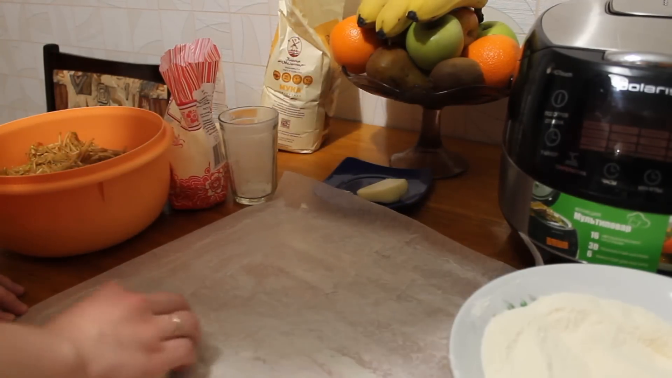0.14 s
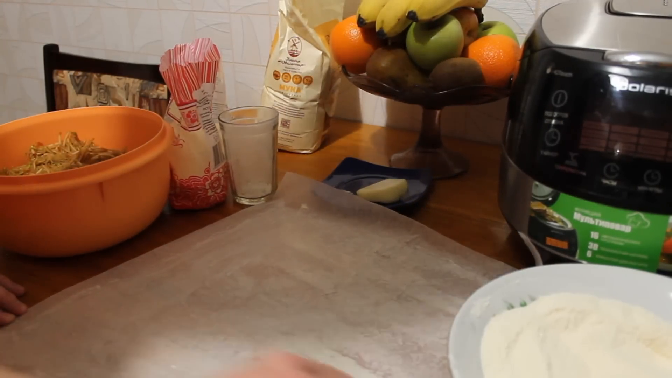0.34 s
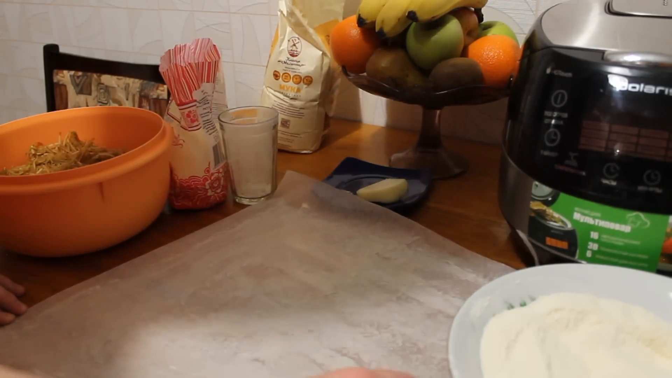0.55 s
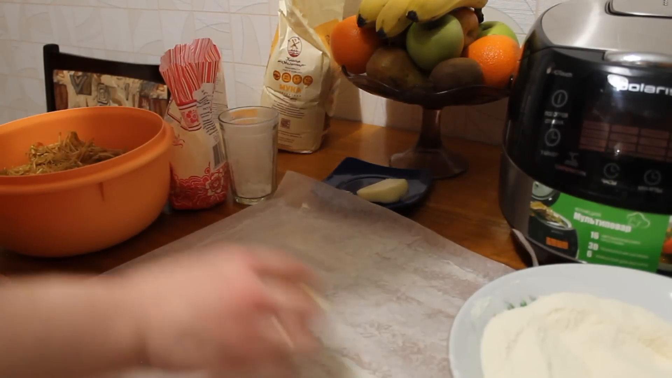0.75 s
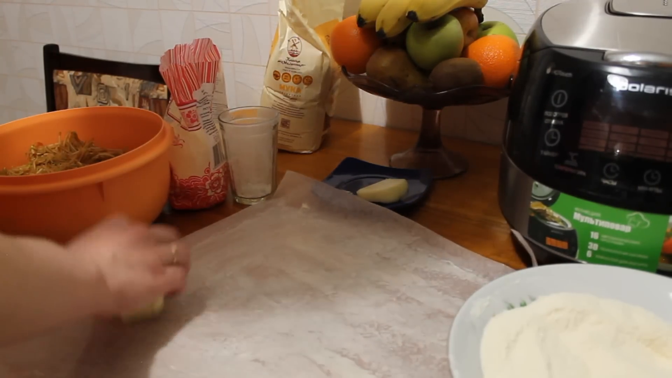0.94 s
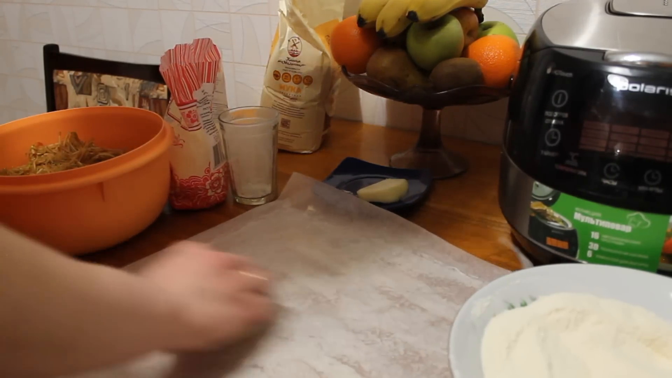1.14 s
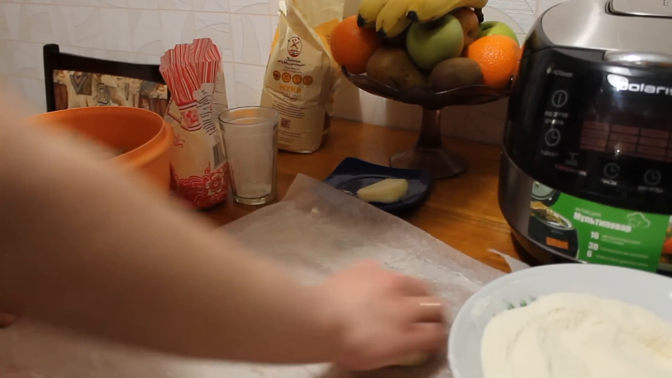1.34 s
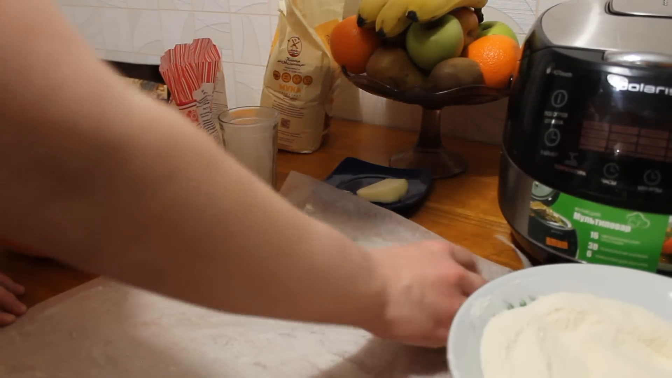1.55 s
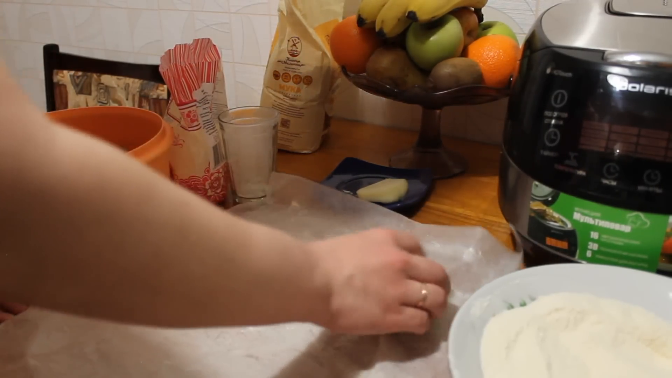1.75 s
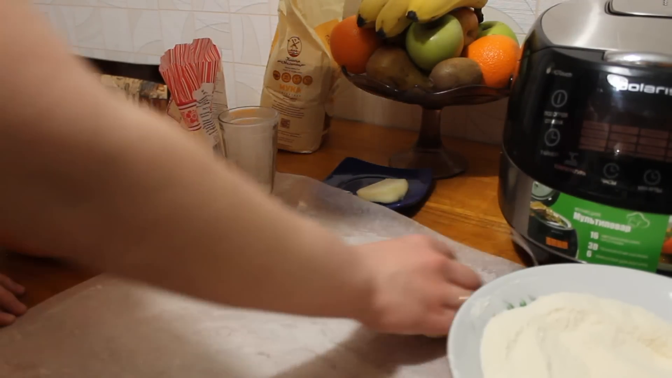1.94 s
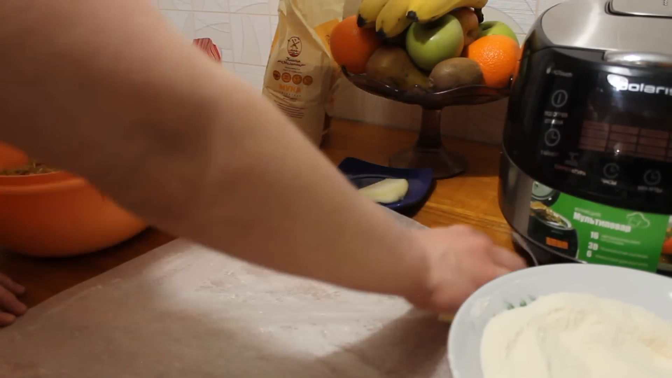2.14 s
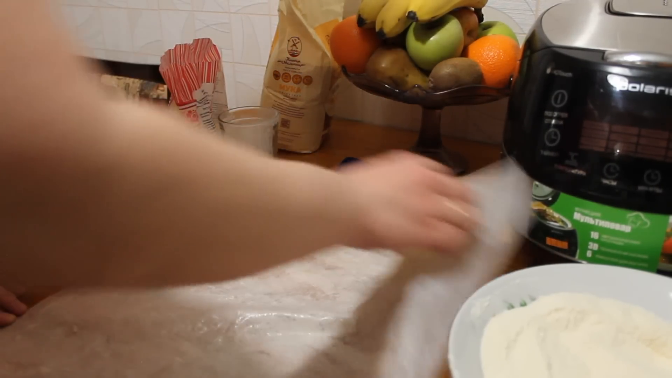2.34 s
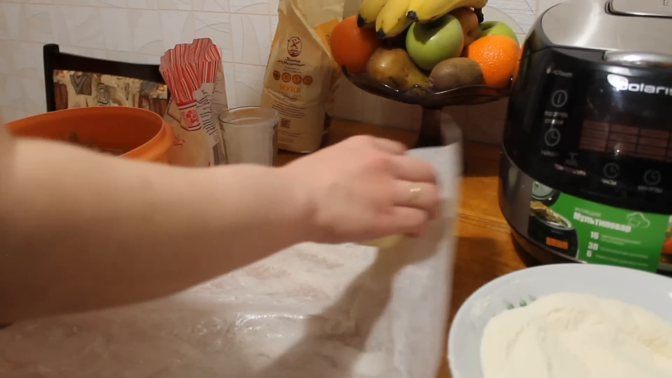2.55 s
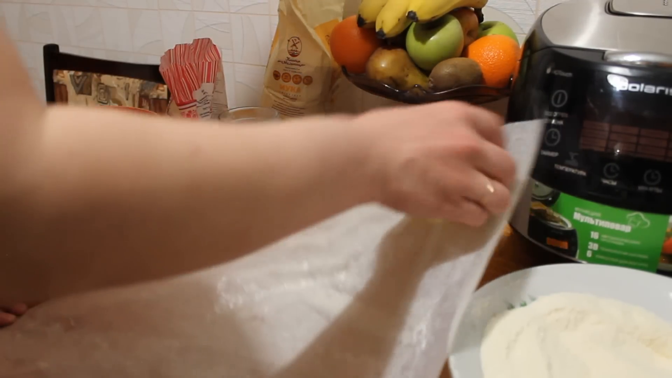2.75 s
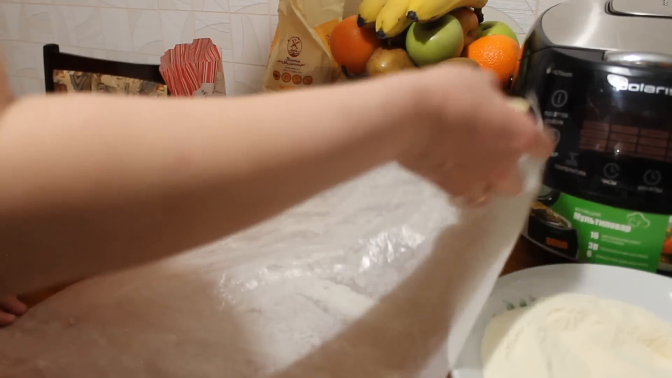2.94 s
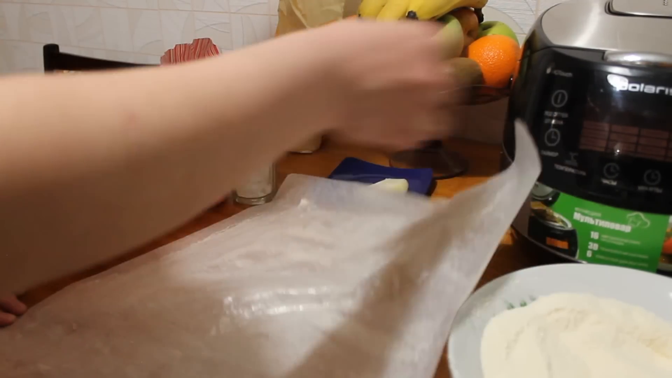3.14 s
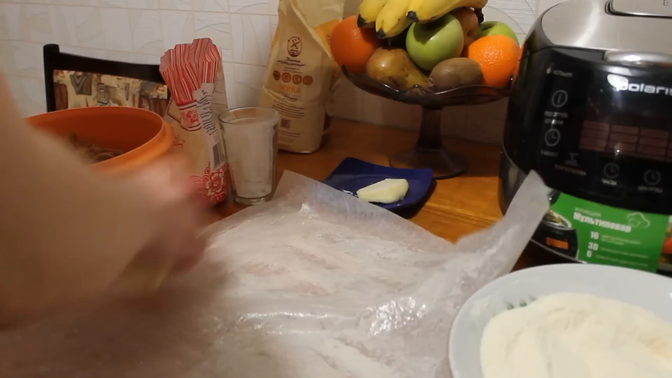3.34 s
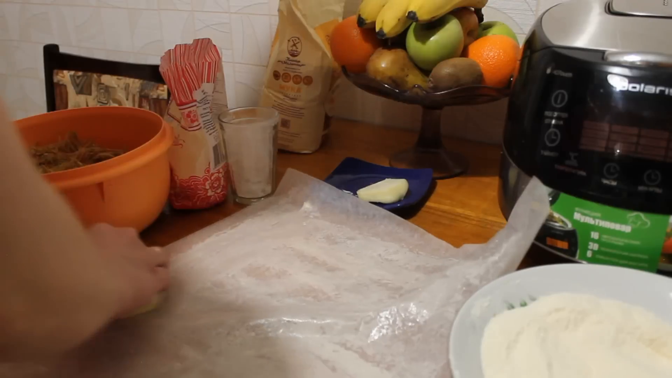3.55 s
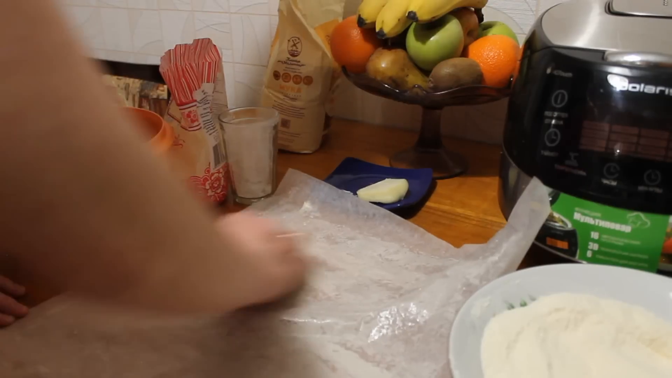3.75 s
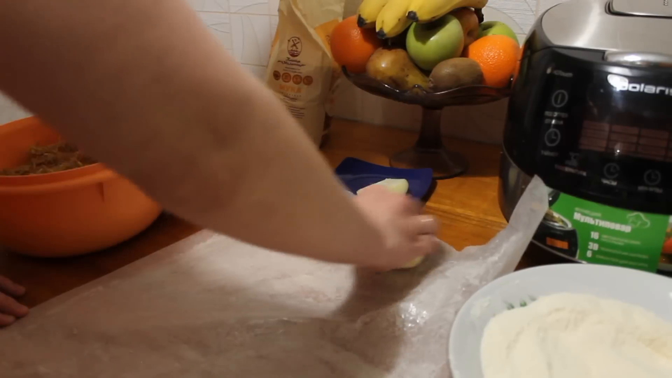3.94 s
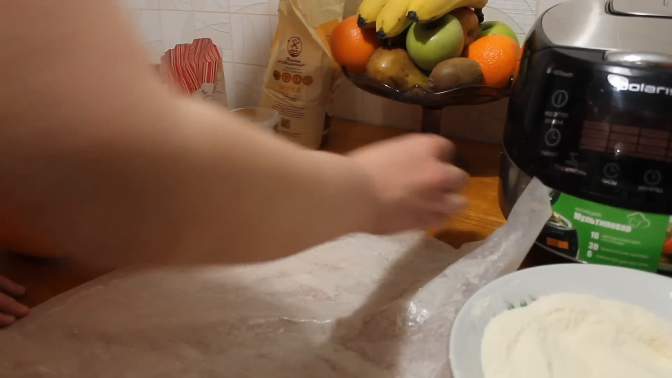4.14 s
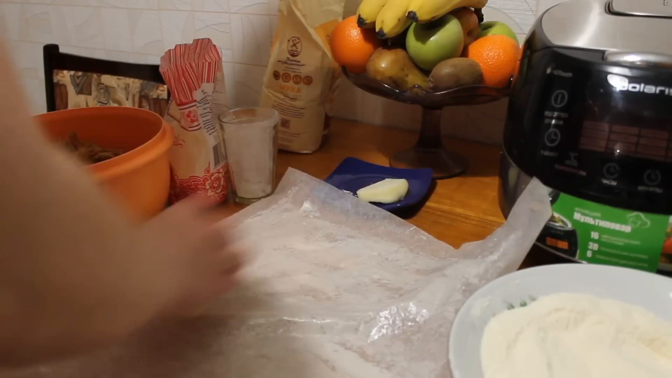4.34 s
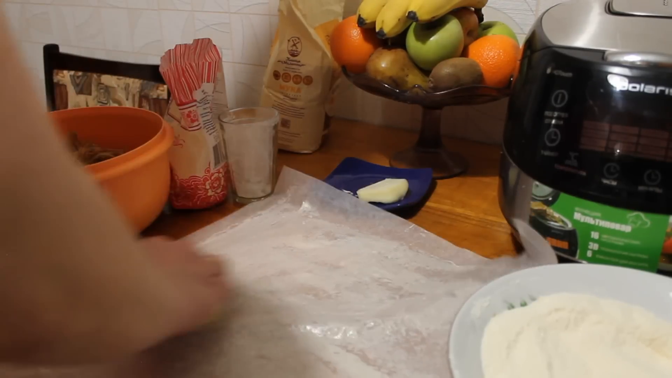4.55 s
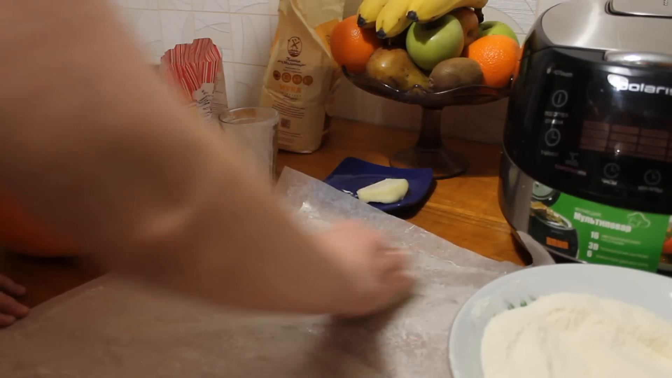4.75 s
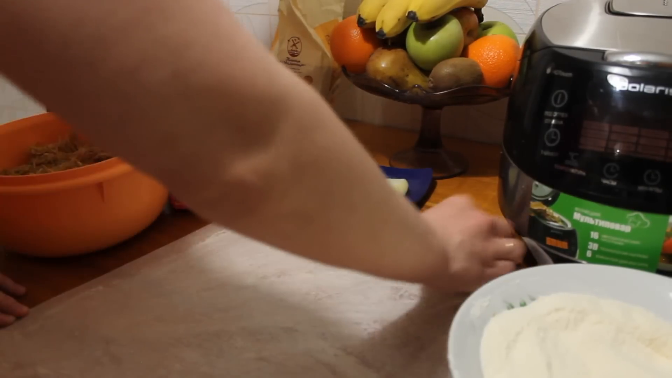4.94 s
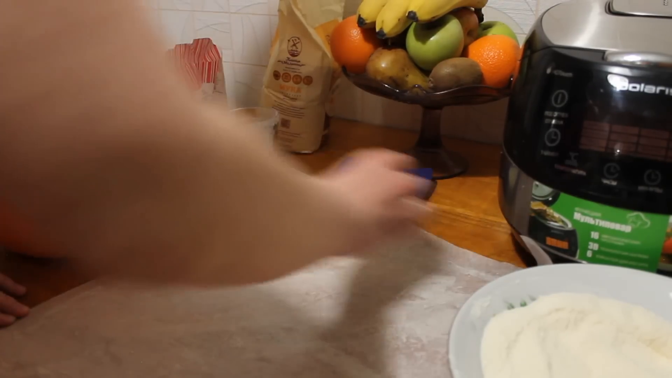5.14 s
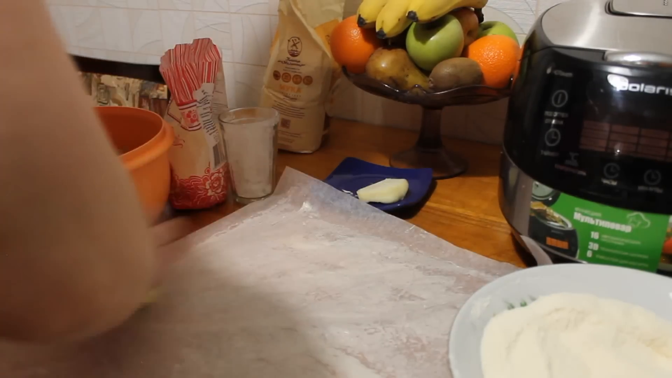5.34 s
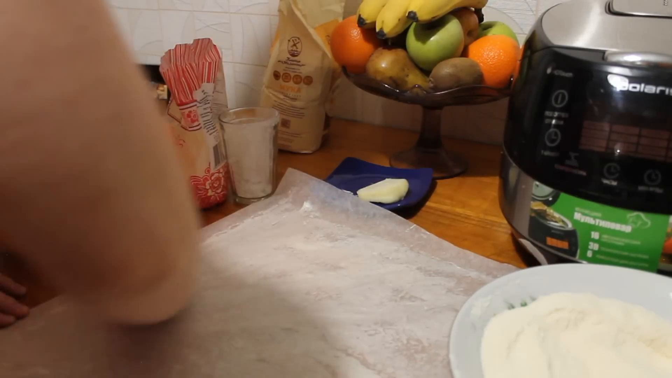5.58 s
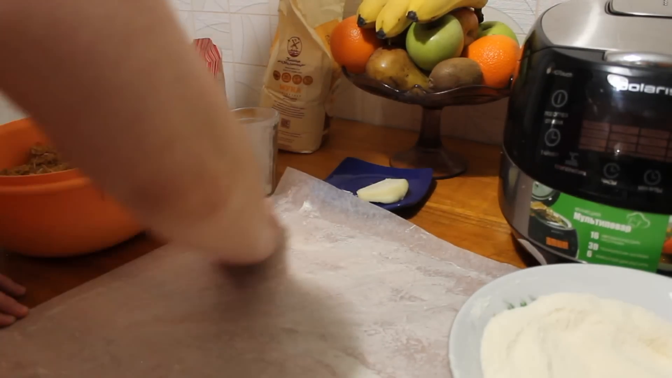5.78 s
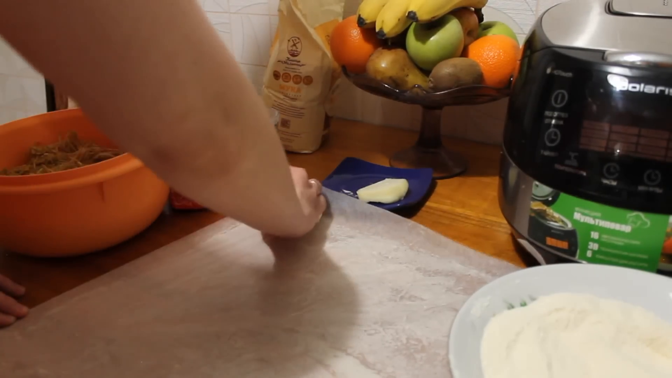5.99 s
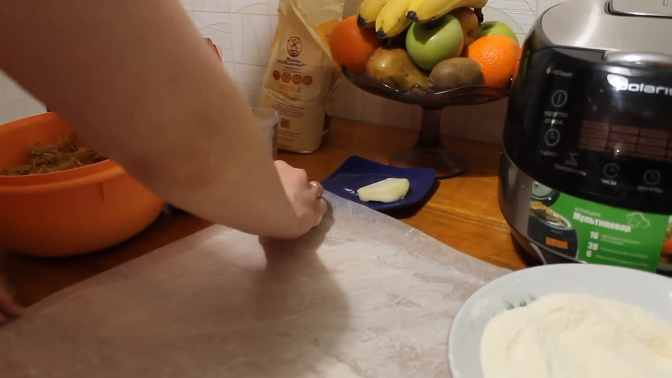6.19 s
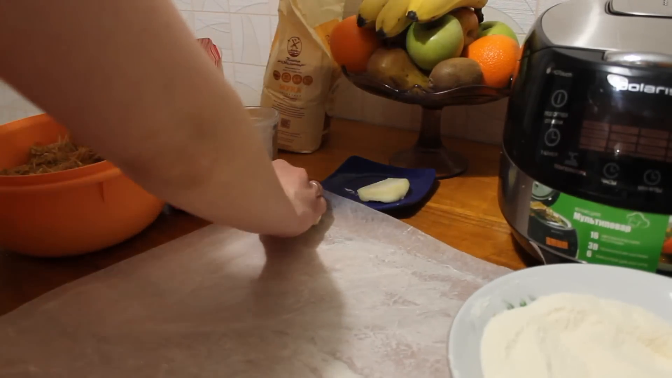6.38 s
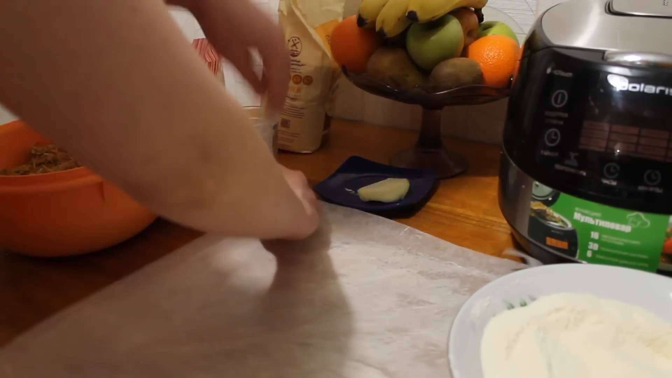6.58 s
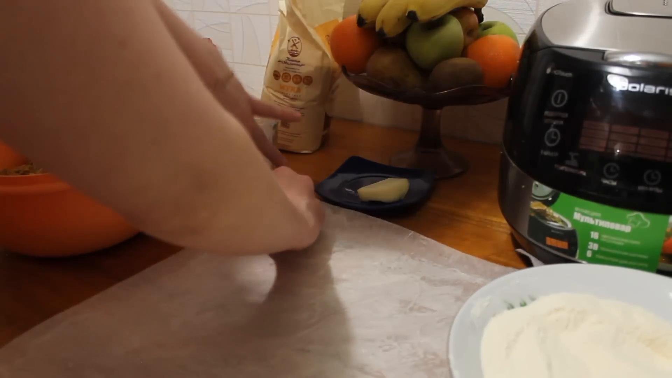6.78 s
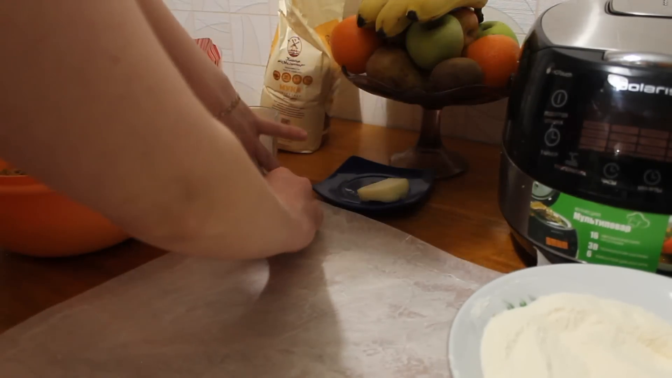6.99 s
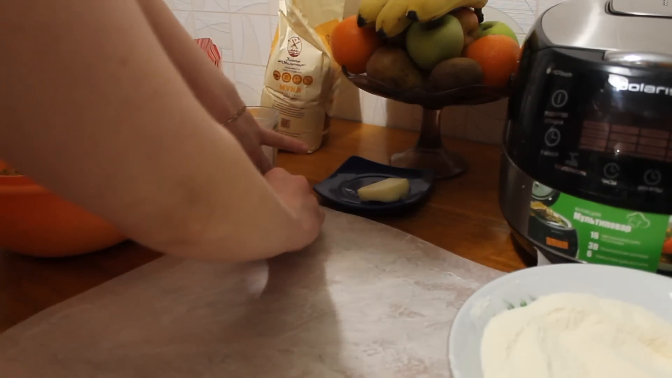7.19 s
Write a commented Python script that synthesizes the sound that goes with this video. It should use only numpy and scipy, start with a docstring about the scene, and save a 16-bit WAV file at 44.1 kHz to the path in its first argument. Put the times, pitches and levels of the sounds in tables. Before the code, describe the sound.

Crisp parchment crinkles and slides under a rubbing hand on a wooden kitchen table, with dull knocks and a faint motor hum behind.

```python
"""A hand rubs butter over baking paper on a wooden kitchen table and lifts one corner; an appliance hums throughout.
From the start the sheet rustles (filtered noise and dense clicks) and creases snap (short noise cracks).
From 0.3 s crushes (bursts of clicks and noise) and thuds (ringing table modes) come, then sliding strokes.
From 1.9 s slack panels also pop (clusters of close sine modes).
Diffuse noise tails give the small kitchen's brief ring behind paper and table."""
import sys
import numpy as np
from scipy import signal
from scipy.fft import rfft, irfft
from scipy.io import wavfile

SR = 44100
rng = np.random.default_rng(int(sys.argv[2]) if len(sys.argv) > 2 else 0)


def transcribe(u):
    """Save the signal u as a 16-bit wav file named by the first command-line argument.

    u: samples, shape (n,) or (channels, n), limited to [-1, 1]; the rate is SR.
    q: integer samples, one column per channel.
    """
    v = np.clip(np.atleast_2d(u).T, -1, 1)
    q = np.round(v * 32767).astype(np.int16)
    wavfile.write(sys.argv[1], SR, q)


N = 318402
TIME = np.arange(N) / SR


def undb(db):
    """Decibels to gain."""
    return 10 ** (np.asarray(db) / 20)


def unit(x):
    """Scale to rms 1."""
    return x / np.sqrt(np.mean(x ** 2) + 1e-20)


def add(out, start_s, x):
    """Mix x in at start_s."""
    i = max(int(start_s * SR), 0)
    out[i:i + len(x)] += x[:N - i]


def seconds(length_s):
    """Time axis of a short sound."""
    return np.arange(int(length_s * SR)) / SR


def on_log_axis(hz, points):
    """Interpolate (Hz, value) points over log frequency."""
    point_hz, value = np.transpose(points)
    return np.interp(np.log(np.maximum(hz, 1)), np.log(point_hz), value)


def colour(x, points, tilt_db_per_octave=0):
    """Minimum-phase filter through (Hz, dB) points, tilted about 4 kHz; the tilt is flat below 400 Hz."""
    size = 2048
    hz = np.maximum(np.arange(size // 2 + 1) * SR / size, 1)
    gain_db = on_log_axis(hz, points) + tilt_db_per_octave * np.log2(np.maximum(hz, 400) / 4000)
    # folding the cepstrum makes the filter causal
    cepstrum = irfft(np.log(undb(gain_db)))
    cepstrum[1:size // 2] *= 2
    cepstrum[size // 2 + 1:] = 0
    impulse = irfft(np.exp(rfft(cepstrum)))
    return signal.fftconvolve(x, impulse)[:len(x)]


def band(x, lo_hz, hi_hz, order=2):
    """Butterworth band-pass."""
    edges_hz = [lo_hz, min(hi_hz, .49 * SR)]
    return signal.sosfilt(signal.butter(order, edges_hz, "band", fs=SR, output="sos"), x)


def walk(knots_per_s):
    """Random line between independent knots, rms 1."""
    knots = rng.standard_normal(2000)
    return unit(np.interp(TIME * knots_per_s, np.arange(len(knots)), knots))


# colour of the appliance's noise: freq_hz, gain_db
AIR_COLOUR = [(25, -39), (48, -22.5), (80, -19.5), (120, -13.5), (160, -10.5), (293, -9.5), (450, -11),
              (520, -11), (750, -11.5), (1100, -19), (1800, -25.5), (2250, -25.5), (2700, -24.5),
              (16000, -43.5)]
# appliance tones: pitch_hz, level_db (rms), waver_hz (rms)
HUM_TONES = [(49, -75.5, 1.2), (100.5, -60, 1.2), (303, -57, 6.98), (503, -63, 4.83), (544, -63, 3.6),
             (619, -59.5, 3.9), (700, -62.5, 8), (867, -64, 5.6), (2120, -66, 19)]
AIR_DB = -50.5


def appliance():
    """Steady coloured motor noise plus sines of randomly wavering pitch."""
    air = unit(band(colour(rng.standard_normal(N), AIR_COLOUR), 45, 19000)) * undb(AIR_DB)
    tones = np.zeros(N)
    for pitch_hz, level_db, waver_hz in HUM_TONES:
        cycles = np.cumsum(pitch_hz + waver_hz * walk(25)) / SR
        tones += undb(level_db) * np.sqrt(2) * np.sin(2 * np.pi * cycles)
    return air + tones


# paper slides under the hand or is carried by it: start_s, end_s, level_db, bright_db, grit_db (clicks re hiss)
STROKES = [(0.378, 0.771, -38, 3.5, 1.5), (1.245, 1.661, -39, 1.5, 6), (1.728, 3.13, -34, -4, 3.5),
           (3.12, 3.388, -39, -9.5, 7), (3.326, 3.788, -34, -1, 6.5), (3.83, 4.299, -36.5, 2.5, 3),
           (4.7, 5.161, -36, 2.5, 4), (5.696, 6.49, -43, 0.5, 5), (6.47, 6.68, -52.5, 2, 5),
           (6.67, 7.163, -46, 3, -2)]
STROKE_ATTACK_S, STROKE_RELEASE_S = 0.063, 0.041
# sheet bends, rustle swells: peak_s, level_db, rise_s, fall_s, bright_db, grit_db (clicks re hiss)
BENDS = [(0.04, -47.5, 0.087, 0.042, 2, 5), (0.626, -30.5, .03, 0.023, 3, -1),
         (1.901, -20, 0.035, 0.095, 3.5, 3.5), (2.16, -21.5, .02, 0.038, 6, 8),
         (2.37, -32, 0.034, 0.021, 3, 4), (2.59, -18.5, 0.065, 0.051, -0.5, 1.5),
         (2.885, -26.5, .025, 0.065, -8, -2), (3.039, -22.5, 0.04, 0.061, 0, 3),
         (3.77, -28, 0.017, 0.018, 8.5, 5), (4.05, -29.5, 0.037, 0.063, 0, 2.5),
         (4.26, -30, 0.04, .038, 2, 3), (5.069, -27.5, 0.027, 0.021, -1.5, 1),
         (5.16, -29, 0.03, 0.023, 2.5, 2.5), (6.22, -32.5, 0.014, 0.096, 3.5, 4),
         (6.37, -33.5, .015, 0.054, 7, 7), (6.74, -32.5, 0.04, 0.16, 6.5, -0.5)]


def movements():
    """Strokes ramp up, hold and decay; bends swell and relax exponentially. Gives (gain, bright_db, grit_db)."""
    moves = []
    for start_s, end_s, level_db, bright_db, grit_db in STROKES:
        attack = np.clip((TIME - start_s) / STROKE_ATTACK_S, 0, 1)
        release = np.exp(-np.maximum(TIME - end_s, 0) / STROKE_RELEASE_S)
        moves.append((undb(level_db) * (attack * release), bright_db, grit_db))
    for peak_s, level_db, rise_s, fall_s, bright_db, grit_db in BENDS:
        swell = np.exp(-np.maximum((peak_s - TIME) / rise_s, (TIME - peak_s) / fall_s))
        moves.append((undb(level_db) * swell, bright_db, grit_db))
    return moves


# colour of moving paper: freq_hz, gain_db
PAPER_COLOUR = [(150, -13), (300, -12), (560, -8.5), (820, -4.5), (1200, -2.5), (1600, -4), (2300, 0),
                (3000, 8), (4200, 12), (6000, 7), (8000, 3.5), (10000, -0.5), (13000, -2.5), (16000, -8)]


def registers(x):
    """Paper sound split into broad flexing, middle rustle and crisp edge, each at rms 1."""
    x = colour(x, PAPER_COLOUR)
    flex = unit(band(x, 240, 2100, order=3))
    middle = unit(band(x, 2000, 8200, order=4))
    edge = unit(band(x, 7800, 20000, order=4))
    return flex, middle, edge


def buckling(clicks_per_s, spread_db, ring_s, tint_db):
    """Clicks of very unequal size; each crease has its own colour, and its low tones ring longer."""
    chance = rng.random((30000, 2))
    at = (np.cumsum(-np.log(chance[:, 0])) / clicks_per_s * SR).astype(int)
    size_db = spread_db * np.minimum(-np.log(chance[:, 1]), 3.5)
    edges_hz = np.geomspace(250, 19000, 10)
    out = 0
    for lo_hz, hi_hz in zip(edges_hz, edges_hz[1:]):
        own_tint_db = tint_db * np.clip(rng.standard_normal(len(at)), -2, 2)
        energy = undb(size_db + own_tint_db) ** 2
        # ring_s is the amplitude decay at 4 kHz
        keep = np.exp(-2 / (SR * ring_s * np.sqrt(4000 / lo_hz)))
        impulses = np.bincount(at[at < N], energy[at < N], N) + 1e-12
        envelope = np.sqrt(signal.lfilter([1], [1, -keep], impulses))
        out = out + band(unit(envelope) * rng.standard_normal(N), lo_hz, hi_hz, order=3)
    return unit(out)


FLEX_DB, EDGE_DB = -5, -10.5  # re the middle, at zero brightness
FLEX_LOSS_SHARE = 0.64  # share of the brightness that the lows lose


def rustle(moves, edge_grit_db=3, flex_grit_db=-2, uneven_db=1.5):
    """Sliding hiss and buckling clicks, grittiest in the treble; the hand's pressure is never even."""
    clicks = registers(buckling(clicks_per_s=1200, spread_db=5.5, ring_s=0.002, tint_db=5.5))
    hisses = registers(rng.standard_normal(N) * undb(1.8 * walk(90)))
    gain, bright_db, grit_db = map(np.array, zip(*moves))
    power = gain ** 2
    parts_db = (FLEX_DB - FLEX_LOSS_SHARE * bright_db, 0 * bright_db, EDGE_DB + bright_db)
    extras_db = (flex_grit_db, 0, edge_grit_db)
    out = 0
    for click, hiss, part_db, extra_db in zip(clicks, hisses, parts_db, extras_db):
        # each move's power is shared between clicks and hiss
        grit = undb(grit_db + extra_db) ** 2
        hiss_share = undb(part_db) ** 2 / (1 + grit)
        click_gain = np.sqrt(hiss_share * grit @ power)
        hiss_gain = np.sqrt(hiss_share @ power)
        out = out + click_gain * click + hiss_gain * hiss
    return out * undb(uneven_db * walk(22))


# kitchen reverberation: freq_hz, t60_s
ROOM_DECAY = [(100, 0.38), (600, 0.48), (3000, 0.38), (7000, 0.08), (15000, 0.11)]


def kitchen(x, wet_db, gap_s=0.0016, count=16):
    """Close tiled walls return a short diffuse tail; each of count equal time blocks has its own noise pattern."""
    t = seconds(.45)
    edges_hz = np.geomspace(60, 19000, 10)
    tails = 0
    for lo_hz, hi_hz in zip(edges_hz, edges_hz[1:]):
        t60_s = on_log_axis(np.sqrt(lo_hz * hi_hz), ROOM_DECAY)
        noise = band(rng.standard_normal((count, len(t))), lo_hz, hi_hz, order=3)
        tails = tails + noise * undb(-60 * t / t60_s)
    tails = tails * np.clip(t / gap_s - 1, 0, 1)
    wet = np.zeros(N)
    for part, when_s, tail in zip(np.array_split(x, count), np.array_split(TIME, count), tails):
        add(wet, when_s[0], signal.fftconvolve(part, tail / np.linalg.norm(tail)))
    return x + undb(wet_db) * wet


# loudest creases snap through: start_s, level_db (before snap_db), bright_db
LOUD_SNAPS = [(0.032, -35, 7), (0.301, -28, -1), (0.319, -24, -0.5), (0.4565, -29.5, 0),
              (0.613, -33.5, 13.5), (0.736, -23, -4.5), (1.307, -33.5, 10), (1.3964, -36, 4),
              (1.529, -26, -2), (1.719, -25.5, 0.5), (1.7326, -26, 4), (1.781, -27, 0.5), (1.8525, -20, 6),
              (1.8815, -18, 5), (1.9754, -20, 0.5), (2.106, -24, 4), (2.1427, -21.5, 5), (2.27, -23, -6.5),
              (2.3307, -24, -1), (2.3727, -21, -5), (2.4612, -23, -6), (2.4995, -21.5, -7),
              (2.5315, -14.5, -6), (2.614, -19.5, -11.5), (2.8194, -31, 6), (2.8585, -29.5, 10),
              (3.029, -23, -2), (3.063, -22.5, -6), (3.0708, -26, -8), (3.1318, -24, 2), (3.172, -34.5, 14),
              (3.225, -27, -4), (3.416, -28, -9), (3.482, -33, 12.5), (3.7352, -30, 4), (3.761, -25, -3.5),
              (3.7963, -28, -9.5), (3.9108, -31, 4), (4.1043, -23, -6.5), (4.2415, -20.5, 7),
              (4.416, -42.5, -4), (4.4645, -44.5, -6), (4.8376, -23, 6), (5.2658, -42.5, -2),
              (5.6119, -24.5, 7.5), (5.64, -22.5, 6), (5.7242, -15, -0.5), (5.99, -34.5, 4),
              (6.2183, -14, 1.5), (6.357, -23.5, 4.5), (6.513, -37, -7), (6.678, -33.5, -2),
              (6.736, -23.5, -3), (6.893, -27.5, -10)]
SNAP_FLEX_DB, SNAP_EDGE_DB = -11.5, -4  # re the middle, at zero brightness


def snaps(rows, flex_s=0.0063, middle_s=0.0039, edge_s=0.00091, flutter_s=0.013, flutter_db=-17, snap_db=-8):
    """A crease flips with a sharp crack, shortest in the treble, and the sheet around it shivers."""
    out, t = np.zeros(N), seconds(.03)
    onset = 1 - np.exp(-t / 0.00036)
    flutter = undb(flutter_db) * np.exp(-t / flutter_s)
    for start_s, level_db, bright_db in rows:
        parts = registers(rng.standard_normal(len(t)))
        parts_db = (SNAP_FLEX_DB - bright_db, 0, SNAP_EDGE_DB + bright_db)
        for part, part_db, crack_s in zip(parts, parts_db, (flex_s, middle_s, edge_s)):
            shape = onset * (np.exp(-t / crack_s) + flutter)
            add(out, start_s, undb(level_db + part_db + snap_db) * unit(shape * part))
    return out


SNAPS_PER_S, SMALL_SNAP_TINT_DB = 11, 5.5
# level re the movement, its ceiling before the random spread, and that spread (+-)
SMALL_SNAP_DB, SMALL_SNAP_TOP_DB, SMALL_SNAP_SPREAD_DB = 3, -25, 2.5


def small_snaps(moves, count=120):
    """Chance rows (start_s, level_db, bright_db) for smaller creases; level follows the paper's movement."""
    moving_db = 10 * np.log10(sum(gain ** 2 for gain, _, _ in moves) + 1e-12)
    jitter, size, tint = rng.uniform(-1, 1, (count, 3)).T
    start_s = (np.arange(count) + 1 + jitter) / SNAPS_PER_S
    level_db = np.minimum(np.interp(start_s, TIME, moving_db) + SMALL_SNAP_DB, SMALL_SNAP_TOP_DB)
    level_db = level_db + SMALL_SNAP_SPREAD_DB * size
    rows = np.transpose([start_s, level_db, SMALL_SNAP_TINT_DB * tint])
    return list(rows[start_s < TIME[-1]])


# colour of paper crushed against the table: freq_hz, gain_db
CRUSHED_COLOUR = [(150, -15.5), (450, -9), (800, -6), (1500, -4.5), (2700, 3), (4200, 4), (6000, 3.5),
                  (8000, 3.5), (10000, -1.5), (16000, -9.5)]
# bulges of paper pressed flat: start_s, level_db, length_s, tilt_db_per_octave
CRUSHES = [(0.301, -33, .014, -1), (0.316, -27, 0.021, 0), (1.214, -21.5, 0.015, 0),
           (1.894, -24.5, 0.058, -2), (2.148, -19.5, .033, .7), (3.628, -14.5, 0.032, -.5),
           (4.241, -26.5, 0.013, -1), (4.611, -27.5, 0.022, -2.5), (4.62, -18.5, .06, 0),
           (4.709, -16.5, 0.028, -0.5), (4.834, -27, .008, -3), (5.596, -31.5, 0.03, -2),
           (5.632, -23, 0.043, -1), (5.704, -28.5, 0.033, -1), (6.187, -21, .011, -1.5),
           (6.212, -20.5, 0.039, -3)]
CRUSH_RISE_SHARE = 0.055  # rise time re length: a larger bulge takes longer to give way


def crushes(fall_s=0.017, grit_db=2):
    """Many creases give way at once as a bulge collapses: a burst of dense clicks and noise."""
    out, t = np.zeros(N), seconds(0.14)
    clicks = buckling(clicks_per_s=2600, spread_db=4.5, ring_s=0.00055, tint_db=1.5)
    crackle = unit(undb(grit_db) * clicks + rng.standard_normal(N))
    for start_s, level_db, length_s, tilt_db_per_octave in CRUSHES:
        piece = crackle[int(start_s * SR):][:len(t)]
        grains = unit(band(colour(piece, CRUSHED_COLOUR, tilt_db_per_octave), 160, 23000))
        rise = 1 - np.exp(-t / (CRUSH_RISE_SHARE * length_s))
        fall = np.exp(-np.maximum(t - length_s, 0) / fall_s)
        add(out, start_s, undb(level_db) * rise * fall * grains)
    return out


# table-top modes: mode_hz, mode_db (relative), t60_s
TABLE_MODES = [(82.6, -10.5, 0.076), (108, -16.5, 0.16), (142, -3.5, 0.19), (171, -12, 0.14),
               (197.2, -4, 0.14), (262.7, -3.5, 0.24), (292, -0.5, 0.11), (351, 6, 0.062),
               (395, 3.5, 0.065), (449, -6, 0.3), (494, -6.5, 0.14), (667, -11.5, 0.16)]
# hand and butter land, then settle (levels before THUD_DB; hardness is the contact's cutoff):
# start_s, first_db, first_hardness_hz, second_after_s, second_db, second_hardness_hz
THUDS = [(0.302, -18, 600, .017, -20.5, 700), (1.217, -17.5, 450, .0345, -23.5, 900),
         (3.637, -13, 90, .012, -22, 550), (4.628, -22, 493, .032, -25.5, 454),
         (5.596, -15.5, 115, .015, -33, 130)]
THUD_DB = -7


def thuds():
    """The table top rings under the hand; a softer landing reaches only its low modes."""
    out, t = np.zeros(N), seconds(.4)
    mode_hz, mode_db, t60_s = np.transpose(TABLE_MODES)[:, :, None]
    # neighbouring modes swing in opposite directions
    sign = (-1) ** np.arange(len(mode_hz))[:, None]
    modes = sign * undb(mode_db - 60 * t / t60_s) * np.sin(2 * np.pi * mode_hz * t)
    onset = 1 - np.exp(-t / 0.0014)
    for start_s, first_db, first_hz, after_s, second_db, second_hz in THUDS:
        blows = ((start_s, first_db, first_hz), (start_s + after_s, second_db, second_hz))
        for blow_s, level_db, hardness_hz in blows:
            ring = (modes / np.hypot(1, (mode_hz / hardness_hz) ** 2)).sum(0)
            add(out, blow_s, undb(level_db + THUD_DB) * ring * onset)
    return band(out, 68, 3000, order=3)


# slack panels of the sheet flip: start_s, pitch_hz, level_db
POPS = [(1.888, 760, -19.5), (1.925, 704, -25), (3.306, 1134, -23), (3.337, 1350, -28), (3.376, 2240, -28),
        (3.416, 1237, -25.5), (4.238, 1940, -21), (4.614, 2010, -22.5), (4.651, 2100, -17.5),
        (4.835, 1474, -18.5), (5.636, 1400, -23)]


def pops(ring_s=0.0062, spread=0.074):
    """A panel pops hollowly: three close modes ring for a moment."""
    out, t = np.zeros(N), seconds(.06)
    envelope = (1 - np.exp(-t / 0.00077)) * np.exp(-t / ring_s)
    for start_s, pitch_hz, level_db in POPS:
        offset = spread * np.array([[-1], [0], [1]]) * rng.uniform(.5, 1.5, (3, 1))
        modes_hz = pitch_hz * (1 + offset)
        sines = np.sin(2 * np.pi * (modes_hz * t + rng.random((3, 1))))
        ring = np.array([.5, 1, .5]) @ sines
        add(out, start_s, undb(level_db) * ring * envelope)
    return out


def scene():
    """Paper and table in the kitchen, over the hum; small snaps get more reverberation."""
    moves = movements()
    paper = kitchen(rustle(moves) + crushes() + pops() + snaps(LOUD_SNAPS), wet_db=-11.5)
    table = kitchen(thuds(), wet_db=-11.5)
    small = kitchen(snaps(small_snaps(moves)), wet_db=-8.5)
    return (paper + table + appliance() + small)[None]


TOP_HZ = 15900


def record(dry):
    """Steep elliptic low-pass: nearly nothing is left above TOP_HZ."""
    return signal.sosfilt(signal.ellip(10, .1, 70, TOP_HZ, fs=SR, output="sos"), dry)


dry = scene()
out = record(dry)
transcribe(out)
```